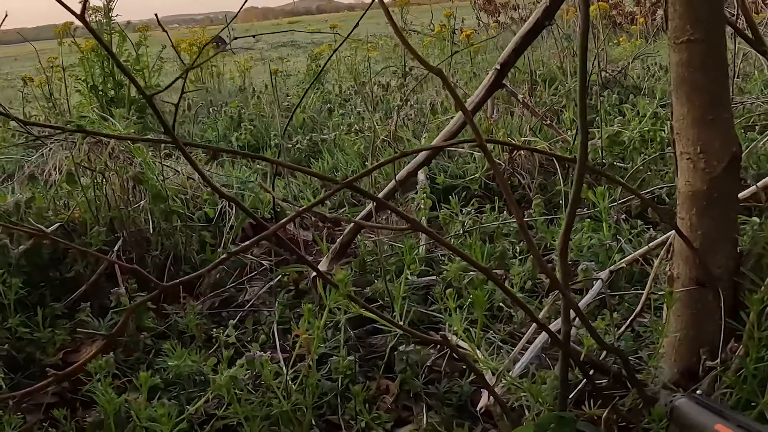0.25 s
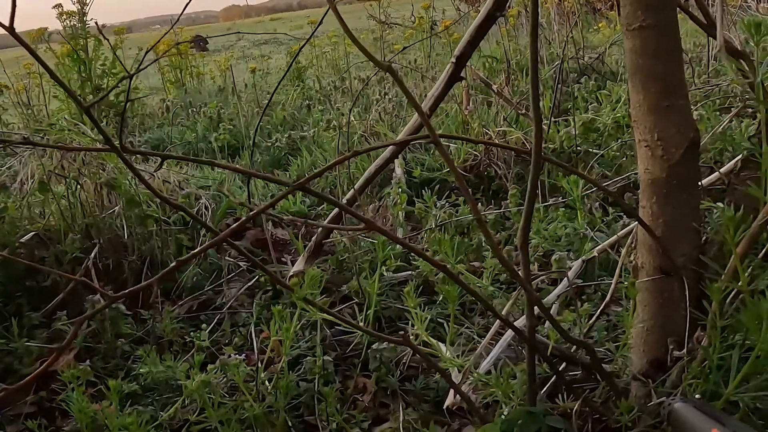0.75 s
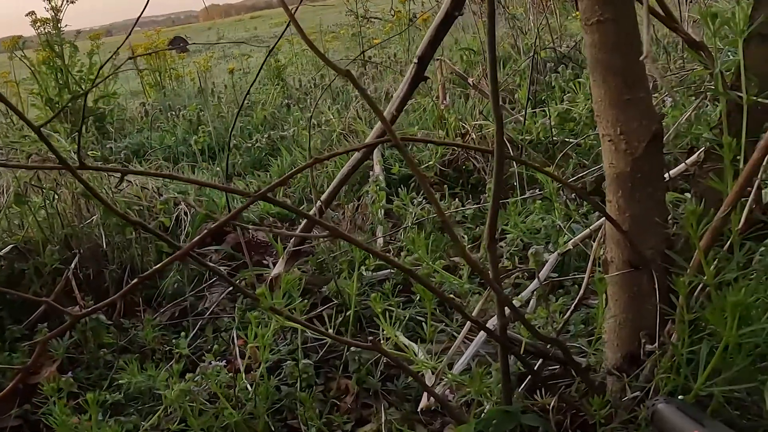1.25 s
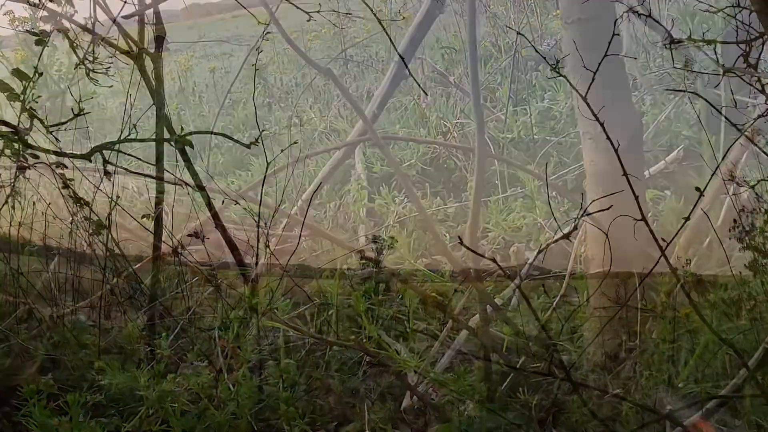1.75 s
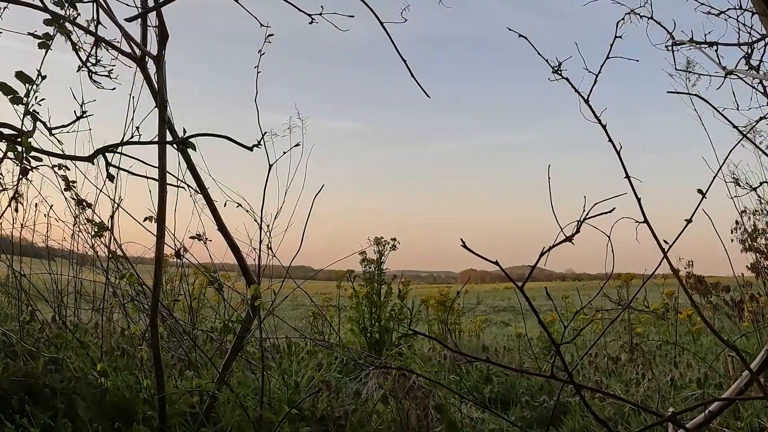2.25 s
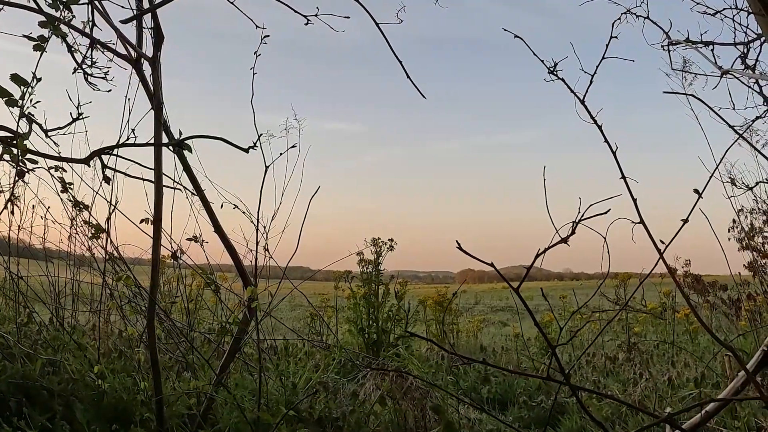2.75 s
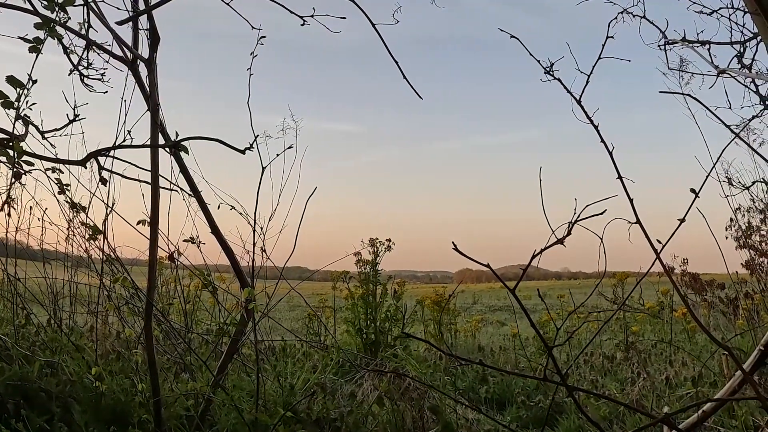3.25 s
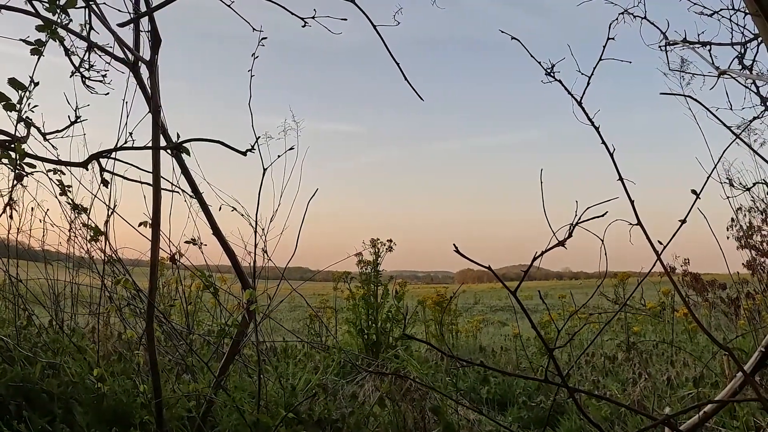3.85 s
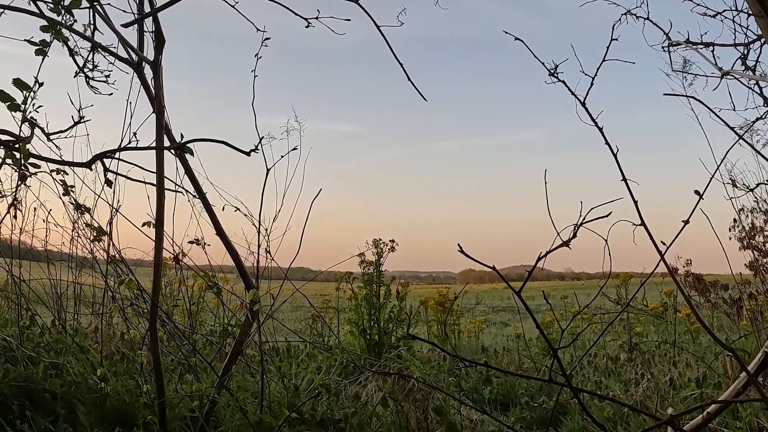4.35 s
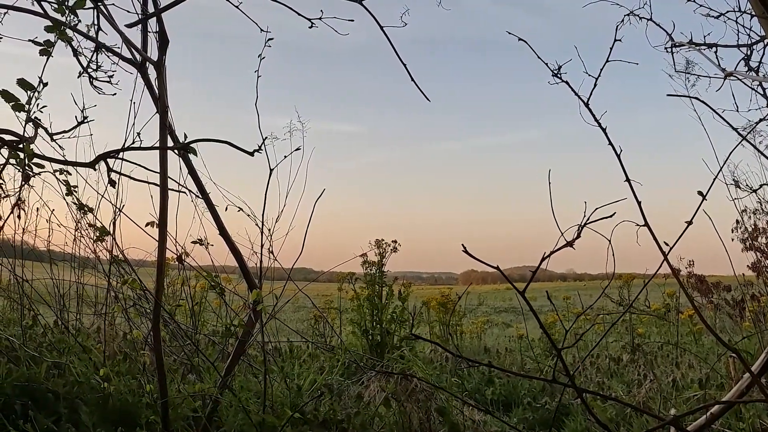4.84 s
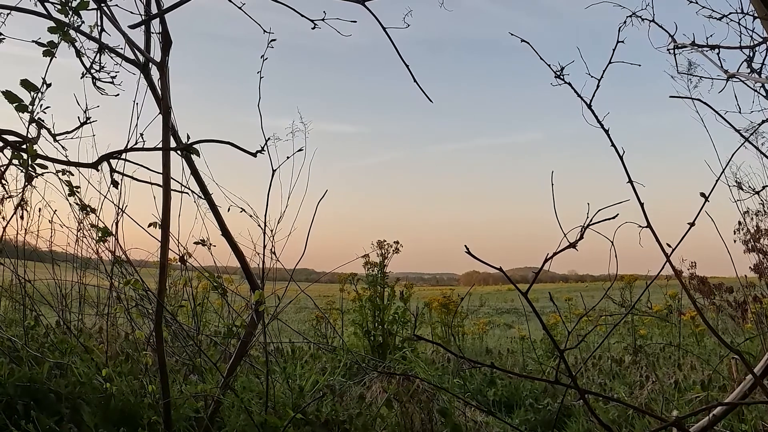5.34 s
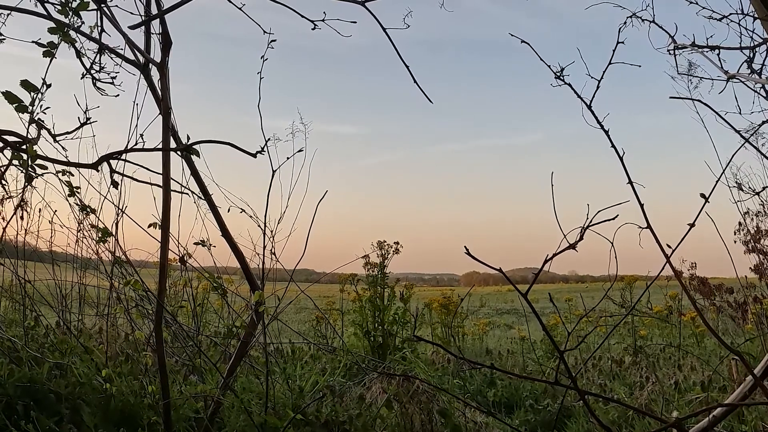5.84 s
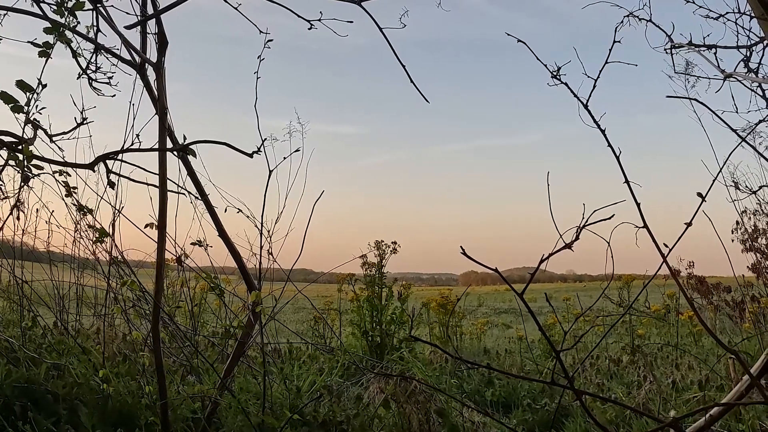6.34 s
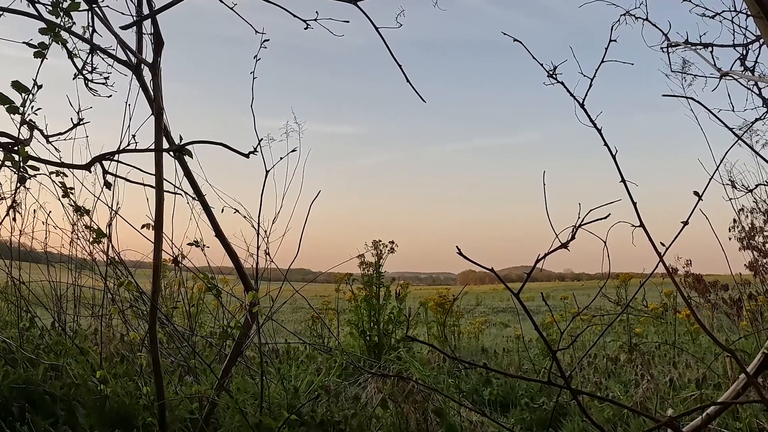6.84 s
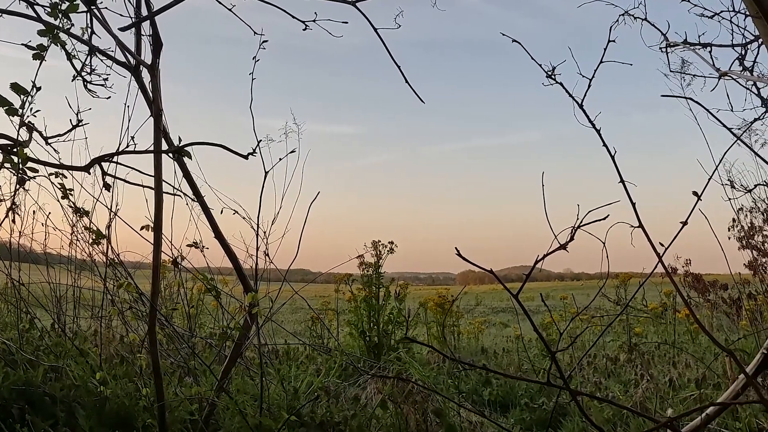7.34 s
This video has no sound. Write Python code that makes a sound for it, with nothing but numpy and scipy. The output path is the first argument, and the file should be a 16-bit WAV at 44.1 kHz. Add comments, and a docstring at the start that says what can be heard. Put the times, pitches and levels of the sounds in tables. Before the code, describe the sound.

From 0 to 1.77 s, undergrowth at a dawn field edge: dry stems snap close by, thickest in the first 0.35 s and again at 0.5-0.8, over fading leaf rustle, low rumble and a far engine swelling near 1.1. Microphone bumps thud at 0.5 and 1.2. A blackbird flutes on the left from 0.45; a nearer one slides upward at 0.93 and rattles harshly until 1.2, with thin small birds behind. A tiny click at 1.77 cuts to a quieter, open, reverberant spot with soft traffic drone and airy hiss. Robins trill and birds chip until 3.3, with a clear high whistle at 3.1. A pheasant crows hoarsely at 3.3-3.8, trailing into clucks. A woodpecker drums rapidly on the left, 4.56-5.5, beneath thin whistles. Soft arched calls follow from 5.96, a short harsh jackdaw call at 6.37, a sagging high whistle at 6.8-7.2, and high notes on the left near 7.5.

```python
"""The wooded edge of a field at dawn, heard from two spots one after the other, a click between them.
First, blackbirds (gliding and swung whistles) sing over snapping stems (rung resonances) and a far engine.
Then, at a quieter spot: trilling robins, small birds, a pheasant and a jackdaw (pulses ringing a throat) and
a woodpecker (blows ringing a trunk) over a traffic tone. Shaped noise makes the rumble, drone and air;
decaying noise makes the scatter from the trees."""
import sys
import numpy as np
from scipy import signal
from scipy.fft import rfft, irfft
from scipy.io import wavfile

SR = 44100
rng = np.random.default_rng(int(sys.argv[2]) if len(sys.argv) > 2 else 0)


def int16_out(signal):
    """Quantize to a 16-bit WAV file."""
    q = np.round(np.clip(np.atleast_2d(signal).T, -1, 1) * 32767)
    wavfile.write(sys.argv[1], SR, q.astype(np.int16))


N = 334719
TIME = np.arange(N) / SR
MOVE_S = 1.772  # the second spot takes over here

# Resonances of a plant stem. Each row: frequency in Hz, width in Hz, relative level in dB.
STEM = [(1770, 550, 18.5), (2170, 1100, 20.5), (3770, 1900, 15.5), (5500, 2600, 4), (10000, 3200, -15)]
# Spectrum of the airy hiss. Each row: frequency in Hz, relative density in dB per Hz.
AIR = [(600, 5), (1000, -1), (1400, 6.5), (2000, -1), (3000, -8), (4500, -11.5), (6300, -5), (7500, -14.5),
       (8800, -23), (11300, -26), (12100, -16), (13000, -33), (15000, -73)]


def from_db(db):
    """Amplitude ratio: a factor of ten for every 20 dB."""
    return 10 ** (np.asarray(db) / 20)


def rms_one(x):
    """Normalisation to unit root-mean-square amplitude."""
    return x / np.sqrt(np.mean(x ** 2) + 1e-20)


def in_time(rows):
    """Linear interpolation of each column of a curve, at every sample."""
    seconds, *columns = np.transpose(rows)
    return [np.interp(TIME, seconds, column) for column in columns]


def at_hz(points, hz):
    """Interpolation of a spectrum along a logarithmic frequency axis."""
    points = np.array(points)
    return np.interp(np.log(hz), np.log(points[:, 0]), points[:, 1])


def add(track, s, sound):
    """Superposition: a sound is added to a track at time s."""
    start = int(np.clip(round(s * SR), 0, N - 1))
    track[start:start + len(sound)] += sound[:N - start]


def wander(t, per_s):
    """Random modulation about 0: straight lines between normal random values, per_s of them a second."""
    knots = rng.standard_normal(size=4096)
    return np.interp(t * per_s, np.arange(len(knots)), knots)


def pan(lean_db):
    """Interaural level difference: left and right gains that differ by lean_db."""
    return from_db(np.array([[.5], [-.5]]) * lean_db)


def resonate(x, modes):
    """Modal superposition: parallel resonances, each applied twice so that the valleys stay dark."""
    out = 0
    for hz, width, db in modes:
        # two passes narrow a peak, so each is made 1.5 times as wide
        b, a = signal.iirpeak(hz, hz / (1.5 * width), fs=SR)
        once = signal.lfilter(b, a, x)
        out = out + from_db(db) * signal.lfilter(b, a, once)
    return out


def knock(modes, contact_s):
    """Impulsive excitation: a brief rough contact rings a body; peak 1."""
    t = TIME[:SR // 25]
    contact = rng.standard_normal(len(t)) * np.exp(-t / contact_s)
    sound = resonate(contact, modes)
    return sound / np.abs(sound).max()


def coloured(white, spectrum):
    """Interchannel coherence: two unrelated noises are coloured and mixed into a stereo field of rms 1."""
    # Each row: frequency in Hz, left-right correlation.
    likeness = [(30, 1), (70, 0.95), (160, 0.99), (300, 0.63), (600, 0.37), (1400, 0.49), (4000, 0.4),
                (12000, 0.48)]
    # Each row: frequency in Hz, left minus right level in dB (ahead of any pan of the source).
    lean = [(60, -3), (110, 0.5), (200, 0), (380, -5), (700, -1), (1290, 1.5), (2380, 4), (4400, 1.5),
            (8120, 5), (15000, 10.5)]
    hz = np.fft.rfftfreq(N, 1 / SR) + 1
    mid, side = rfft(white)
    alike = np.clip(at_hz(likeness, hz), 0, 1)
    field = np.sqrt(1 + alike) * mid + np.sqrt(1 - alike) * side * [[1], [-1]]
    below = np.minimum(hz / spectrum[0][0], 1) ** 2  # roll-off under the lowest point
    colour = below * from_db(at_hz(spectrum, hz))
    return rms_one(irfft(field * colour * pan(at_hz(lean, hz)), N))


def hiss(spectrum):
    """Stationary Gaussian noise with a given spectrum."""
    return coloured(rng.standard_normal((2, N)), spectrum)


def among_trees(x, wet_db, lean_db, lag_ms=0):
    """Multiple scattering: direct sound, later on the left by the lag, plus a quick dense part and a long tail."""
    wood_t60_s, near_t60_s, near_gain = .94, .13, 1.9  # near: the nearest trunks
    t = TIME[:SR]
    decay = from_db(-60 * t / wood_t60_s) + near_gain * from_db(-60 * t / near_t60_s)
    decay = decay * (1 - np.exp(-t / .0017))
    shared, *own = rng.standard_normal((3, SR)) * from_db(1.9 * wander(t, 157))
    scatter = (.58 * shared + np.array(own)) * decay
    scatter /= np.sqrt(np.sum(scatter ** 2) / 2)
    khz = np.fft.rfftfreq(N, 1000 / SR)
    delayed = irfft(rfft(x) * np.exp(-2j * np.pi * khz * lag_ms), N)
    direct = np.array([delayed, x])
    wet = from_db(wet_db)
    scattered = signal.fftconvolve(x[None], scatter, axes=1)[:, :N]
    return pan(lean_db) * (direct + wet * scattered) / np.sqrt(1 + wet ** 2 / 2)


def sing(notes, partials_db, trill_hz, waver, flutter_db):
    """Frequency modulation in the syrinx: glides through three pitches, with slanted trill strokes."""
    out = np.zeros(N)
    for s, length, start, middle, end, db, depth in notes:
        t = TIME[:int(length * SR)]
        glide = np.polyval(np.polyfit([0, .5, 1], [start, middle, end], 2), t / length)
        stroke = (trill_hz * t + .07 * wander(t, 39)) % 1
        hz = glide * (1 + 2 * depth * (1 - 2 * stroke) + waver * wander(t, 314))
        phase = 2 * np.pi * np.cumsum(hz) / SR
        # the deeper the trill, the more each stroke swells in its middle
        pulsing = 1 - np.clip(20 * abs(depth), 0, 1) * np.cos(np.pi * stroke) ** 2
        force = signal.windows.tukey(len(t), .4) * pulsing * from_db(flutter_db * wander(t, 77.5))
        tone = sum(from_db(level) * np.sin(k * phase) for k, level in enumerate(partials_db, 1))
        add(out, s, from_db(db) * rms_one(force * tone))
    return out


def slurred(rows, waver, flutter_db):
    """Pure frequency glides without a trill."""
    return sing([(*row, 0) for row in rows], [0], 0, waver, flutter_db)


def trilled(rows, partials_db, waver, flutter_db):
    """Periodic frequency modulation: evenly sliding notes, each trilled at its own rate."""
    out = 0
    for s, length, start, end, db, depth, rate in rows:
        note = (s, length, start, (start + end) / 2, end, db, depth)
        out = out + sing([note], partials_db, rate, waver, flutter_db)
    return out


def repeated(calls, shape, depth):
    """Pitch scaling: notes of one shape, each at its own time, pitch and level."""
    length, *bend = shape
    return [(s, length, *(hz * np.array(bend)), db, depth) for s, hz, db in calls]


def series(first_s, every_s, hz, db, count):
    """Periodic repetition: equal calls at an even pace."""
    return [(first_s + k * every_s, hz, db) for k in range(count)]


def held(curve, waver, flutter_db, gain_db):
    """A single slowly modulated partial: a long whistle that follows a curve of pitch and level."""
    hz, db = in_time(curve)
    gate = np.clip(np.minimum(TIME - curve[0][0], curve[-1][0] - TIME) / .01, 0, 1)
    phase = 2 * np.pi * np.cumsum(hz * (1 + waver * wander(TIME, 200))) / SR
    level = from_db(db + gain_db + flutter_db * wander(TIME, 60))
    return np.sqrt(2) * gate * level * np.sin(phase)


def rasp(syllables, throat, pulse_hz, jitter, breathy, top_hz):
    """Source and filter: uneven pulses and noise ring throat resonances that move with the beak opening."""
    out = np.zeros(N)
    for s, length, db, open_start, open_end in syllables:
        t = TIME[:int(length * SR)]
        cycles = np.cumsum(pulse_hz * (1 + jitter * wander(t, pulse_hz))) / SR
        pulses = rms_one(np.diff(np.floor(cycles), prepend=-1)) + breathy * rng.standard_normal(len(t))
        pulses = pulses * signal.windows.tukey(len(t), .25) * (1.2 + .5 * t / length)
        pulses = np.pad(pulses, (0, SR // 50))  # room to ring on
        opening = np.interp(TIME[:len(pulses)], [0, length], [open_start, open_end])
        voice = 0
        for closed_hz, open_hz, width, closed_db, open_db in throat:
            # shift the moving resonance to 0 Hz, filter there, and shift back
            turn = np.exp(2j * np.pi * np.cumsum(closed_hz + opening * (open_hz - closed_hz)) / SR)
            r = np.exp(-1.5 * np.pi * width / SR)
            ringing = (turn * signal.lfilter([(1 - r) ** 2], [1, -2 * r, r * r], pulses / turn)).real
            voice = voice + from_db(closed_db + opening * (open_db - closed_db)) * ringing
        add(out, s - .002, from_db(db) * voice / np.sqrt(np.sum(voice ** 2) / len(t)))
    band = signal.butter(4, [850, top_hz], "band", fs=SR, output="sos")
    return signal.sosfilt(band, out)


def low_background(levels, drone):
    """Band-limited noise: the lumpy rumble of moving air and the drone of distant roads."""
    # Each row: frequency in Hz, relative density in dB per Hz.
    rumble = [(8.8, -52), (15, 4.5), (32, -2.5), (59, -8), (110, -21.5), (140, -30), (240, -120)]
    rumble_db, drone_db = in_time(levels)
    return from_db(rumble_db + 2 * wander(TIME, 14)) * hiss(rumble) + from_db(drone_db) * hiss(drone)


def engine_tone(curve, waver, flutter_db):
    """Phase as the integral of frequency: amplitude and phase of an unsteady engine tone."""
    hz, db = in_time(curve)
    phase = 2 * np.pi * np.cumsum(hz * (1 + waver * wander(TIME, 30))) / SR
    return np.sqrt(2) * from_db(db + flutter_db * wander(TIME, 23.1)), phase


def engines():
    """Periodic firing: a far engine with a half-frequency tone revs and eases off; later, fainter traffic."""
    # Each row: time in seconds, pitch in Hz, level in dB ahead of a 2 dB cut.
    engine_curve = [(0.0, 157, -44.5), (0.118, 152.9, -42), (0.418, 178.3, -38), (1.118, 171.1, -33.5),
                    (1.77, 158.5, -42.5)]
    # Each row: time in seconds, pitch in Hz, level in dB.
    traffic_curve = [(2.4, 272.4, -59), (2.9, 238.2, -56), (4.4, 238.9, -53), (5, 247.4, -81),
                     (7.59, 257, -72)]
    level, phase = engine_tone(engine_curve, waver=.018, flutter_db=4)
    engine = from_db(-2) * level * (np.sin(phase) + from_db(-7.5) * np.sin(phase / 2)) * (TIME < MOVE_S)
    level, phase = engine_tone(traffic_curve, waver=.0331, flutter_db=.5)
    return engine + level * np.sin(phase) * (TIME > MOVE_S) * pan(lean_db=-1)


def handling():
    """Structure-borne sound: bumps on the microphone give a low sway and a dull thud of its housing."""
    # Each row: centre in seconds, half length (to 1/e) in seconds, sway peak in dB, thud rms in dB.
    bumps = [(0.515, 0.04, -12.5, -43.5), (1.207, 0.074, -23, -28.5)]
    # Each row: frequency in Hz, width in Hz, relative level in dB.
    housing = [(64.57, 38, -3), (196, 43, 1.5)]
    sway_hz, housing_top_hz = 18, 295.4
    low_pass = signal.butter(4, housing_top_hz, fs=SR, output="sos")
    out = 0
    for s, half, sway_db, thud_db in bumps:
        swell = np.exp(-((TIME - s) / half) ** 2)
        sway = np.cos(2 * np.pi * (sway_hz * TIME + rng.random()))
        thud = signal.sosfilt(low_pass, resonate(rng.standard_normal(N), housing))
        thud /= np.sqrt(np.average(thud ** 2, weights=swell ** 2))
        out = out + swell * (from_db(sway_db) * sway + from_db(thud_db) * thud) * pan(lean_db=-7)
    return out


def vegetation():
    """Impact and granular noise: stems snap over a crackle of tiny leaf contacts."""
    # Each row: start in seconds, peak in dB, gain in dB of stem resonances above 5 kHz.
    snap_rows = [(.003, -26, 10), (.016, -34, -1), (0.057, -28, 23), (0.0928, -27.5, 13), (0.187, -37, 18),
                 (0.226, -33, 18), (0.277, -29, 15.5), (0.323, -35.5, 11), (0.511, -42, -1),
                 (0.583, -29, -10), (.7, -29.5, -13), (.798, -24.5, -9)]
    # Brushing leaves. Each row: time in seconds, level in dB ahead of a 17.5 dB lift.
    rustle = [(0.0, -64.5), (0.18, -68), (0.588, -65), (0.838, -73.5), (1.09, -73.5), (1.656, -78),
              (1.75, -75.5)]
    # Each row: frequency in Hz, relative density in dB per Hz.
    leaf_spectrum = [(700, -16), (1100, 13.5), (1600, 4), (2500, 4.5), (5000, 2.5), (7000, 0),
                     (9000, -10.5), (12500, -12), (15000, -42)]
    snaps = np.zeros(N)
    for s, db, treble_db in snap_rows:
        modes = [(hz, width, level + treble_db * (hz > 5000)) for hz, width, level in STEM]
        add(snaps, s, from_db(db) * knock(modes, contact_s=.0018))
    sizes = from_db(2.5 * np.minimum(rng.exponential(1, (2, N)), 6))
    struck = rng.random(N) < 11000 / SR  # about 11000 contacts a second
    grains = rng.standard_normal((2, N)) * sizes * struck * from_db(3 * wander(TIME, 47))
    leaves = coloured(grains, leaf_spectrum) * from_db(in_time(rustle)[0] + 17.5)
    return among_trees(snaps, wet_db=-37, lean_db=4) + leaves * pan(lean_db=-1.5)


def chorus(first_s, last_s, low_hz, high_hz, level_db, count, droop):
    """Random superposition: short slurs of many far birds; each half falls by about the droop (a share of pitch)."""
    notes = []
    for k, (when, pitch, slope, span, loud) in enumerate(rng.random((count, 5))):
        hz = low_hz * (high_hz / low_hz) ** pitch
        fall = 1 + droop + .207 * (.5 - slope)
        s = first_s + (last_s - first_s) * (k + when) / count
        notes.append((s, .0294 + .075 * span, hz * fall, hz, hz / fall, level_db - 8 * loud, 0))
    return sing(notes, [0], trill_hz=50, waver=.0027, flutter_db=7.5)


def far_chorus():
    """Reverberant distance cue: far birds of the second spot, more scatter than direct sound."""
    flurry = chorus(1.5, 1.8, 1400, 6500, level_db=-66, count=40, droop=.09)
    busy = chorus(1.8, 3.2, 1300, 4500, level_db=-74, count=50, droop=.086)
    busy_high = chorus(2.2, 2.7, 4300, 6600, level_db=-76, count=80, droop=.0904)
    sparse = chorus(2.3, 7.5, 1300, 4500, level_db=-92, count=70, droop=.0855)
    return among_trees(flurry + busy + busy_high + sparse, wet_db=8, lean_db=-2.5)


def far_warbling():
    """Successive frequency glides: phrases of far warbling."""
    # Each row: start in seconds, length in seconds, start, middle and end pitch in Hz, level in dB.
    warbles = [(2.25, 0.033, 3530, 3170, 2840, -65), (2.28, 0.026, 3830, 3380, 3000, -64),
               (2.315, 0.032, 3260, 2800, 2540, -61.5), (2.355, 0.044, 2640, 2780, 2750, -67),
               (2.53, 0.031, 4200, 3890, 3680, -63), (2.83, 0.1, 3130, 2955, 3160, -64.5),
               (3.48, 0.049, 3240, 2870, 2460, -67), (3.585, 0.037, 5620, 4920, 4100, -69),
               (3.75, 0.034, 5020, 4350, 3600, -68), (3.785, 0.035, 2930, 3100, 3820, -67.5),
               (3.905, 0.051, 3020, 2600, 2300, -67.5), (3.98, 0.037, 2570, 3090, 3420, -66.5),
               (5.357, 0.043, 4900, 4040, 3030, -63.5), (5.447, 0.088, 2680, 3130, 3850, -65.5),
               (5.47, 0.055, 4860, 4380, 4070, -66.5), (5.523, 0.04, 3840, 3190, 2460, -62.5),
               (5.585, 0.057, 3670, 3870, 3790, -70.5), (7.045, 0.057, 3020, 2635, 2720, -69),
               (7.09, 0.056, 2700, 3215, 3600, -64), (7.162, 0.045, 3650, 3020, 2530, -63),
               (7.21, 0.03, 2450, 2580, 2470, -66)]
    return among_trees(slurred(warbles, waver=.03, flutter_db=3), wet_db=6, lean_db=2)


def soft_calls():
    """Pure tones with curved pitch: soft arched whistles, then three falling and three rising calls."""
    # Each row: start in seconds, pitch in Hz, level in dB.
    arches = [(2.45, 1500, -62.5), (3.12, 1482, -65.5), (5.962, 1480, -59.5), (6.315, 1404, -59.5),
              (6.86, 1457, -60), (7.37, 1490, -60.5)]
    # Shapes hold the length in seconds, then start, middle and end pitch as shares of the call's pitch.
    arch_shape = (0.091, 0.86, 0.96, 0.825)
    fall_shape = (.065, 1.08, 1, .89)
    rise_shape = (.065, .93, 1, 1.12)
    falls = series(first_s=4.572, every_s=.464, hz=1860, db=-68.5, count=3)
    rises = series(first_s=5.79, every_s=.482, hz=1910, db=-72, count=3)
    notes = repeated(arches, arch_shape, depth=.02)
    notes += repeated(falls, fall_shape, depth=0) + repeated(rises, rise_shape, depth=0)
    return among_trees(sing(notes, [0], trill_hz=50.2, waver=.0053, flutter_db=1.5), wet_db=0, lean_db=.5)


def thin_whistles():
    """Narrow-band tones: long whistles that rise, sag or hold, and a lower voice under one trill."""
    # Each row of these four: time in seconds, pitch in Hz, level in dB ahead of gain_db.
    rising_curve = [(4.3, 4690, -99), (4.34, 4690, -84), (4.716, 4770, -74), (4.76, 4580, -71),
                    (4.808, 4830, -67), (5.172, 4880, -66), (5.224, 5010, -76), (5.368, 4905, -60),
                    (5.5, 5040, -79)]
    sagging_curve = [(6.785, 5780, -79), (6.815, 5520, -59.5), (6.845, 5430, -65), (6.922, 5217, -61),
                     (7.202, 5364, -55), (7.23, 4960, -69)]
    low_curve = [(2.67, 3230, -60), (2.71, 3310, -61), (2.84, 3220, -65)]
    steady_curve = [(3.07, 4100, -63), (3.09, 4040, -63), (3.115, 3980, -54), (3.18, 3967, -56.5),
                    (3.25, 4026, -62), (3.35, 3970, -66), (3.385, 3950, -76)]
    rising = held(rising_curve, waver=.0125, flutter_db=2.5, gain_db=-1)
    sagging = held(sagging_curve, waver=.004, flutter_db=2.5, gain_db=1)
    low = held(low_curve, waver=.025, flutter_db=2.5, gain_db=-3)
    steady = held(steady_curve, waver=.0013, flutter_db=1.5, gain_db=0)
    moving = among_trees(rising + sagging + low, wet_db=-2, lean_db=.5)
    return moving + among_trees(steady, wet_db=-4, lean_db=1, lag_ms=.04)


def near_whistle():
    """Direct-to-scattered ratio as nearness: three high whistled notes on the left."""
    # Each row: start in seconds, length in seconds, start, middle and end pitch in Hz, level in dB,
    # trill depth as half the peak deviation (share of pitch).
    near_notes = [(7.385, 0.022, 7360, 8050, 8400, -74, 0.018), (7.52, 0.028, 8800, 8180, 7500, -75, .02),
                  (7.545, 0.062, 7240, 7020, 6900, -60.5, .003)]
    tone = sing(near_notes, [0], trill_hz=90, waver=.004, flutter_db=2.5)
    return among_trees(tone, wet_db=-2, lean_db=7)


def chips():
    """Harmonic series: short chips whose second partial is the strongest."""
    # Each row: start in seconds, pitch in Hz, level in dB.
    chip_calls = [(1.73, 3473, -61), (1.95, 3370, -57.5), (2.135, 3340, -59.5), (2.44, 3500, -56),
                  (2.612, 3490, -60.5)]
    # Length in seconds, then start, middle and end pitch as shares of the call's pitch.
    chip_shape = (.045, .8, .96, 1)
    notes = repeated(chip_calls, chip_shape, depth=.019)
    tone = sing(notes, [-1.5, 6.5, -6, -24], trill_hz=106, waver=.011, flutter_db=2.5)
    return among_trees(tone, wet_db=7.5, lean_db=2)


def robins():
    """Fast frequency and amplitude modulation: the robins' buzzy trills."""
    # Each row: start in seconds, length in seconds, start and end pitch in Hz, level in dB,
    # depth as half the peak deviation (share of pitch; negative strokes rise), strokes per second.
    trills = [(1.745, 0.23, 6630, 7480, -56, -0.0285, 78), (2.2, 0.43, 5780, 5300, -68.5, 0.11, 89),
              (2.668, 0.17, 3960, 3980, -58.5, -0.074, 53), (2.96, 0.093, 7300, 7200, -72, 0.038, 94),
              (2.965, 0.094, 3800, 4800, -68.5, 0.031, 70), (3.135, .085, 5200, 4240, -64.5, -.04, 83),
              (3.27, 0.054, 4600, 4230, -66, 0.086, 78), (4.66, 0.16, 6500, 6540, -68, -0.086, 43),
              (5.22, 0.29, 5070, 5000, -69.5, 0.054, 84), (5.695, 0.16, 6280, 5990, -66.5, 0.0056, 82)]
    return among_trees(trilled(trills, [0], waver=.018, flutter_db=2.5), wet_db=3, lean_db=0, lag_ms=.015)


def jackdaw():
    """Formant filtering: the two halves of a jackdaw's harsh call."""
    # Each row: start in seconds, length in seconds, level in dB ahead of the band filter,
    # beak opening 0-1 at start and at end.
    halves = [(6.3645, 0.0112, -39, 0.18, 0.91), (6.374, .0105, -33.5, 0.7, 0.18)]
    # Each row: frequency in Hz closed and open, width in Hz, relative level in dB closed and open.
    throat = [(1107, 1300, 91, -2, -14), (1330, 1560, 265, -2, -4), (1590, 2240, 170, 0.5, 3),
              (1900, 2400, 160, -14, -6), (2700, 3120, 260, -22, -9), (3600, 4300, 390, -24, -15)]
    call = rasp(halves, throat, pulse_hz=599, jitter=.1, breathy=.55, top_hz=4800)
    return among_trees(call, wet_db=-5.5, lean_db=-2, lag_ms=.04)


def woodpecker():
    """Repeated impacts on a resonator: a roll of hard bill blows on a dry trunk."""
    # Each row: frequency in Hz, width in Hz, relative level in dB.
    trunk = [(1393, 124, 9), (1650, 124, 12), (1990, 160, 13), (2520, 210, 5)]
    start_s, every_s, count = 4.5585, .05952, 16
    k = np.arange(count)
    # peaks gain force at once (first blow 6 dB down) and tire at the end (last blow 2.5 dB down)
    peaks_db = -43 - 6 * np.exp(-k) - 2.5 * (k / k[-1]) ** 4
    out, t = np.zeros(N), TIME[:SR // 25]
    for s, db in zip(start_s + k * every_s, peaks_db):
        contact = (t == 0) + .075 * rng.standard_normal(len(t)) * np.exp(-t / .0034)
        blow = resonate(contact, trunk)
        add(out, s, from_db(db) * blow / np.abs(blow).max())
    return among_trees(out, wet_db=.5, lean_db=6, lag_ms=.14)


def pheasant():
    """Formant filtering: a pheasant's hoarse crow that trails off in clucks."""
    # Each row: start in seconds, length in seconds, level in dB ahead of the band filter,
    # beak opening 0-1 at start and at end.
    syllables = [(3.305, 0.044, -45.5, 0.51, 0.88), (3.355, 0.027, -44.5, 0.6, 0.63),
                 (3.373, 0.018, -39, 0.47, 0), (3.402, 0.022, -57, .1, 0), (3.514, 0.044, -49.5, 0, 0.28),
                 (3.56, 0.014, -42.5, 0.14, .1), (3.574, 0.013, -50, 0.17, 0.13),
                 (3.588, 0.019, -43.5, 0.32, 0.094), (3.61, 0.031, -56, 0.89, 0.6),
                 (3.68, 0.018, -54.5, 0.46, 0.13), (3.719, 0.04, -49.5, 0.36, 0),
                 (3.742, 0.064, -51, 0.005, 0.4), (3.858, 0.036, -57, 0.31, 0.32),
                 (3.95, 0.055, -63, 0.92, 0.9), (4.03, 0.059, -56.5, 0.49, 0.27),
                 (4.13, 0.041, -62, 0.79, 1)]
    # Each row: frequency in Hz closed and open, width in Hz, relative level in dB closed and open.
    throat = [(1055, 1406, 98, 13.5, -1), (1300, 1655, 160, 3.5, 1.5), (1610, 1750, 190, 2.5, -2.5)]
    crowing = rasp(syllables, throat, pulse_hz=344.7, jitter=.074, breathy=.55, top_hz=2020)
    return among_trees(crowing, wet_db=-6, lean_db=-1.3, lag_ms=.035)


def high_voices():
    """Layered whistles: high notes, and thin high slurs (some a fifth above the blackbirds' notes) among the
    blackbirds' notes, over a scattered far chorus."""
    # Each row: start in seconds, length in seconds, start, middle and end pitch in Hz, level in dB,
    # trill depth as half the peak deviation (share of pitch).
    high_notes = [(.645, 0.0255, 6370, 7520, 7270, -40.5, 0.012), (.97, 0.16, 7230, 6960, 6960, -64, 0.026)]
    # Each row: start in seconds, length in seconds, start, middle and end pitch in Hz, level in dB.
    slurs = [(.195, .025, 4710, 4830, 4800, -52), (.375, 0.062, 4750, 4830, 4300, -56.5),
             (.505, 0.032, 4070, 3850, 3600, -52), (.6, 0.03, 4400, 4150, 3600, -60),
             (.63, 0.014, 4150, 3940, 3900, -49), (.952, 0.023, 5140, 5390, 5500, -58),
             (1.202, 0.022, 5813, 5340, 5050, -55.5), (1.235, 0.031, 4900, 4400, 4070, -58.5),
             (1.275, 0.017, 4270, 4040, 3600, -58), (1.437, 0.024, 5820, 5320, 5060, -55),
             (1.475, 0.05, 4800, 4130, 3740, -55)]
    high = sing(high_notes, [0, -24], trill_hz=123, waver=.011, flutter_db=4)
    far = chorus(.044, 1.4, 3700, 5500, level_db=-60.5, count=30, droop=.0883)
    thin_slurs = among_trees(slurred(slurs, waver=.0096, flutter_db=1), wet_db=0, lean_db=3)
    return among_trees(high, wet_db=-3, lean_db=2.5) + among_trees(far, wet_db=15, lean_db=2.5) + thin_slurs


def rattle(hoarse, uneven):
    """Wide frequency modulation: a whistle swung unevenly, roughened by fast shaking of the membrane."""
    # Each row: time in seconds, centre in Hz, swing to either side in Hz, level in dB ahead of the high-pass.
    curve = [(1.0, 2370, 30, -37), (1.03, 2360, 50, -32), (1.05, 2220, 130, -37), (1.065, 2020, 330, -35.5),
             (1.125, 1940, 360, -36), (1.165, 1780, 300, -37.5), (1.2, 1620, 260, -43),
             (1.225, 1550, 230, -52)]
    swings_per_s = 57
    centre, swing, db = in_time(curve)
    since, left = TIME - curve[0][0], curve[-1][0] - TIME
    hz = centre + swing * (np.cos(2 * np.pi * swings_per_s * since) + uneven * wander(TIME, 330))
    shake = hoarse * np.sqrt(swing / swing.max()) * (wander(TIME, 900) + 1j * wander(TIME, 900))
    carrier = np.exp(2j * np.pi * np.cumsum(hz) / SR)
    tone = (carrier * (1 + shake)).real / np.sqrt(1 + hoarse ** 2)
    # the throat passes no lows
    tone = signal.sosfilt(signal.butter(6, 1250, "high", fs=SR, output="sos"), tone)
    gate = np.clip(np.minimum(since, left) / .0023, 0, 1)
    return np.sqrt(2) * gate * from_db(db) * tone


def blackbirds():
    """Gliding near-pure tones: one bird flutes on the left; a nearer one, near the centre, slides up and rattles."""
    # Each row of both: start in seconds, length in seconds, start, middle and end pitch in Hz, level in dB.
    fluted_notes = [(0.454, 0.025, 3430, 3085, 2310, -43.5), (0.485, 0.016, 2630, 2700, 2770, -40),
                    (0.505, 0.045, 2910, 2412, 2280, -36.5), (0.755, 0.058, 3117, 2875, 1990, -38),
                    (1.14, 0.041, 3200, 3220, 3240, -43), (1.189, 0.099, 3790, 2866, 2700, -36),
                    (1.371, 0.0507, 2100, 2530, 2290, -39), (1.423, 0.051, 2470, 2980, 3516, -37),
                    (1.472, 0.047, 3450, 3450, 3050, -45.5), (1.504, 0.068, 3320, 2680, 2080, -36)]
    slide_notes = [(0.926, 0.091, 1095, 1462, 1523, -37)]
    fluted = sing([(*row, .008) for row in fluted_notes], [0, -39], trill_hz=58.9, waver=.02, flutter_db=3)
    slide = sing([(*row, 0) for row in slide_notes], [0, -6.5], trill_hz=0, waver=.005, flutter_db=1)
    harsh = slide + rattle(hoarse=.9, uneven=.3)
    fluted = among_trees(fluted, wet_db=2, lean_db=5.5, lag_ms=.05)
    return fluted + among_trees(harsh, wet_db=-5, lean_db=1, lag_ms=.055)


def first_spot():
    """Superposition of sources: in the undergrowth, under the blackbirds."""
    # Each row: time in seconds, rumble level in dB, drone level in dB.
    levels = [(0, -31, -39.5), (.5, -29, -35), (1.2, -34.5, -40.5), (1.75, -35.5, -38)]
    # Each row: frequency in Hz, relative density in dB per Hz.
    drone = [(80, 0.5), (120, -1), (170, 2), (215, -1.5), (280, -16.5), (400, -22.5), (600, -34),
             (900, -74), (2000, -72)]
    background = low_background(levels, drone) * pan(lean_db=-.5) + from_db(-58.5) * hiss(AIR)
    return background + vegetation() + high_voices() + blackbirds()


def second_spot():
    """Superposition of sources: facing the open field, birds with various shares of scatter."""
    # Each row: time in seconds, rumble level in dB, drone level in dB.
    levels = [(1.85, -44.5, -47.5), (2.6, -46.5, -47.5), (4.2, -46, -47.5), (5.3, -41, -49),
              (5.9, -48, -51), (6.8, -41, -52.5), (7.59, -47, -52)]
    # Each row: frequency in Hz, relative density in dB per Hz.
    drone = [(60, -14), (90, -2), (125, -3), (160, 0), (200, -5), (250, -6.5), (330, -16.5), (520, -22.5),
             (750, -31.5), (1200, -25), (2200, -88)]
    air = from_db(-65 + .55 * wander(TIME, 1.8)) * hiss(AIR)
    far = far_chorus() + far_warbling() + soft_calls()
    small = thin_whistles() + near_whistle() + chips() + robins()
    return low_background(levels, drone) + air + far + small + jackdaw() + woodpecker() + pheasant()


def scene():
    """Linear crossfade: the first spot gives way to the second with a brief click."""
    moved = np.clip((TIME - MOVE_S) / .0042, 0, 1)
    click = np.zeros(N)
    softened = [(hz, width, db / 2) for hz, width, db in STEM]  # stem resonances, evened out
    add(click, MOVE_S - .002, from_db(-33) * knock(softened, contact_s=.00036))
    spots = (1 - moved) * first_spot() + moved * second_spot()
    return engines() + handling() + spots + click


def record(dry):
    """Band limitation: a steep elliptic low-pass cuts the top."""
    cutoff_hz = 15300
    return signal.sosfilt(signal.ellip(10, .1, 80, cutoff_hz, fs=SR, output="sos"), dry)


dry = scene()
out = record(dry)
int16_out(out)
```